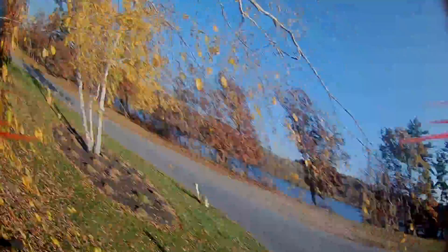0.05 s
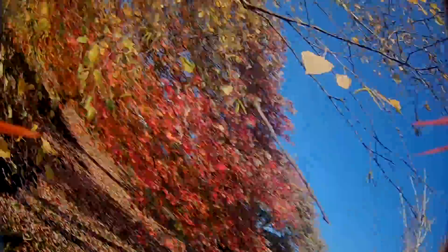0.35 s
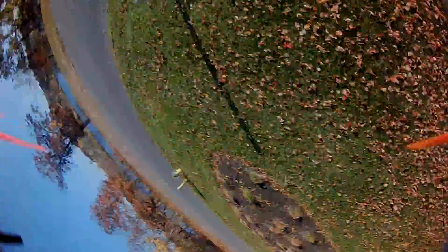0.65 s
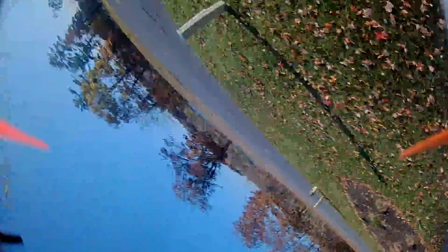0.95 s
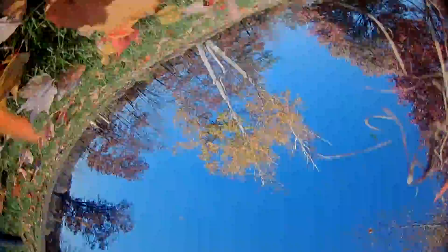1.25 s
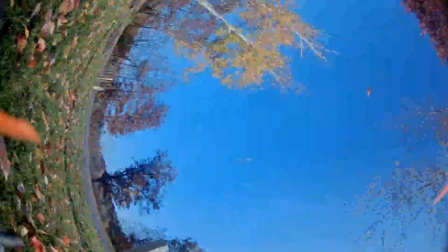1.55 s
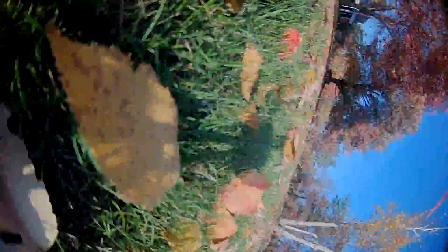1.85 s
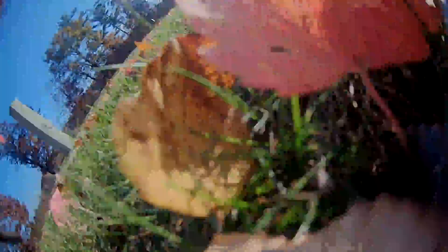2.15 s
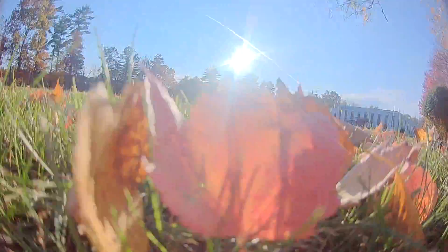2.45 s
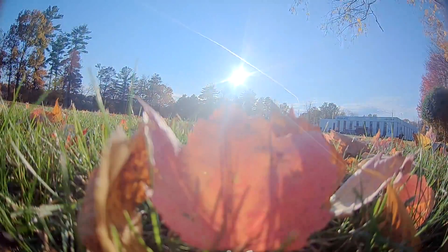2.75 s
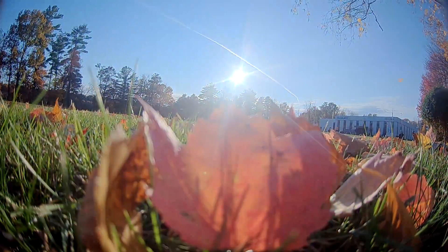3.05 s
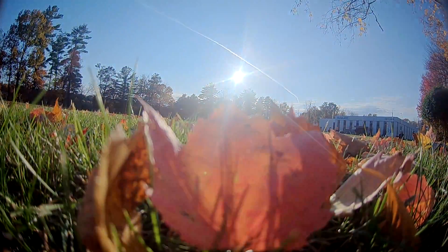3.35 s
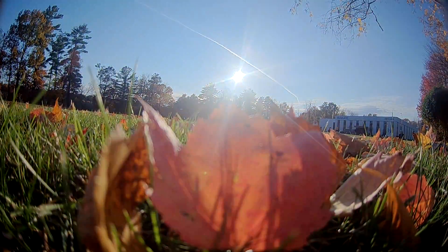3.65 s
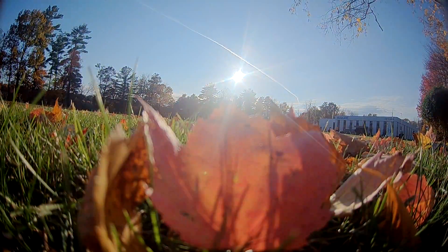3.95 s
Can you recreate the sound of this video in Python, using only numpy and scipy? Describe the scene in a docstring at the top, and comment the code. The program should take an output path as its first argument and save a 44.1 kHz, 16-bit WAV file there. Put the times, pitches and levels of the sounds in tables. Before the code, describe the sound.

A small drone buzzes in loud, distorted surges as its propellers shred leaves. The motors wind down, and it scrapes through branches, then tumbles over dry leaves with crunches and twig snaps. Heard from the drone itself, outdoors.

```python
"""In a birch and on the dry leaves below, heard point-blank from the microphone on a crashing drone.
The motors surge and overload the microphone while the propellers thrash the leaves, then coast down.
The frame brushes the last branches, falls, and tumbles over leaves and grass with crunches, snapping
twigs and dull bumps. It lies still, with a few late ticks in quiet air."""
import sys
import numpy as np
from scipy import signal
from scipy.fft import rfft, irfft, next_fast_len
from scipy.io import wavfile
from scipy.ndimage import uniform_filter1d, map_coordinates

SR = 44100
rng = np.random.default_rng(int(sys.argv[2]) if len(sys.argv) > 2 else 0)


def inscribe(sig):
    """Save sig as 16-bit PCM at rate SR to the path in sys.argv[1].

    A 1-D sig is mono; a 2-D sig holds one channel per row.
    Samples are clipped to [-1, 1] before scaling.
    """
    pcm = np.round(np.clip(np.atleast_2d(sig).T, -1, 1) * 32767)
    wavfile.write(sys.argv[1], SR, pcm.astype(np.int16))


N = 176400

# Tone colour of each source. Each row: frequency in Hz, relative level in dB.
AIR_SPECTRUM = [(25, -21), (120, -11), (350, -15.5), (650, -11.5), (1200, -4.5), (2100, -3.5), (5000, -12),
                (7400, -18), (8300, -34), (11000, -15), (15000, -23.5)]
SIZZLE_SPECTRUM = [(5800, -29), (7100, -4), (9000, -32), (11200, -7.5), (12200, -34.5), (15500, -33.5)]
BUMP_SPECTRUM = [(30, 0), (100, 8), (300, -27), (1500, -60)]
RUSTLE_SPECTRUM = [(30, -30), (350, -39), (700, -14), (1200, -5.5), (2200, 1.5), (3600, 1.5), (5000, -3),
                   (6800, -6.5), (8200, -25.5), (11000, -13.5), (16000, -24.5)]
CRISP_SPECTRUM = [(5000, -34), (9000, -18), (11200, 3.5), (14000, -9.5), (15500, -15.5)]
CRUNCH_SPECTRUM = [(30, -28), (350, -28), (700, -10.5), (1200, -3), (2200, 0), (3600, -1.5), (5000, -4),
                   (6800, -8), (8200, -22), (11000, -12), (16000, -23)]
THRASH_SPECTRUM = [(30, -22), (400, -19.5), (750, -12), (1200, -4), (2400, -2), (4000, -5), (6500, -13),
                   (9000, -16.5), (16000, -21)]
BRANCH_SPECTRUM = [(30, -31.5), (300, -25), (550, -7.5), (850, -2.5), (1700, -2), (2600, -7.5),
                   (4000, -20.5), (6500, -39.5), (9000, -38), (16000, -52)]
# Overall tone colour: dulled, rippled treble with dips at 10, 12 and 14 kHz.
# Each row: frequency in Hz, gain in dB.
OVERALL_COLOUR = [(30, -6), (3000, -0.5), (6800, -5), (8200, -9.5), (10000, -16.5), (11200, -12.5),
                  (12000, -19.5), (13000, -13.5), (14000, -18), (15400, -5)]

# How the noises swell and fade at the microphone. Each row: time in seconds, level in dB.
SIZZLE_LEVELS = [(.76, -36.5), (0.852, -32), (.95, -36), (1.07, -41.5)]  # as the motors run out
RUSTLE_LEVELS = [(1.3, -19), (1.35, -37.5), (1.38, -34), (1.4, -45), (1.5, -46.5), (1.53, -43), (1.6, -52),
                 (1.725, -50), (1.745, -29.5), (1.804, -28), (1.824, -21), (1.855, -26.5), (1.884, -35),
                 (1.907, -23.5), (1.946, -31.5), (1.985, -29), (2.03, -32), (2.06, -18.5), (2.15, -24.5),
                 (2.21, -33), (2.25, -26), (2.395, -25), (2.535, -26.5), (2.566, -34.5), (2.582, -48.5),
                 (2.615, -38.5), (2.635, -36.5), (2.675, -43), (2.76, -52.5), (2.82, -72)]  # leaves under the falling, rolling frame
CRISP_LEVELS = [(1.74, -39), (1.88, -52), (1.955, -38.5), (1.99, -33), (2.06, -30), (2.2, -52.5),
                (2.35, -39), (2.41, -57.5)]  # grass and leaves sliding over the frame
THRASH_LEVELS = [(0, -2.5), (.09, -0.5), (.21, -1), (.28, -6.5), (.34, 2), (.47, -5), (.58, -1),
                 (.64, -10.5), (.72, -1.5), (.79, -13), (.835, -18.5), (.895, -27.5), (.95, -36.5)]  # propellers in the leaves
# The frame on soft ground. Each row: start in seconds, level in dB.
GROUND_BUMPS = [(1.821, -54), (2.126, -32.5), (2.314, -38.5), (2.423, -42), (2.545, -52)]
# Twigs and stalks. Each row: start in seconds, level in dB, pitch in Hz, seconds to die by 60 dB.
TWIG_SNAPS = [(1.451, -22, 3130, 0.015), (1.5496, -18.5, 3360, 0.027), (1.649, -25, 3950, 0.012),
              (1.665, -20.5, 4800, 0.0045), (1.712, -26, 2780, 0.0087), (1.719, -34, 890, 0.058),
              (1.796, -20.5, 3500, 0.012), (1.818, -13.5, 2780, 0.018), (1.845, -15.5, 2500, 0.023),
              (2.045, -6.5, 3300, 0.022), (2.42, -15, 3200, 0.0055), (2.4368, -10.5, 2880, 0.0089),
              (2.458, -8, 2620, 0.013), (2.544, -13.5, 2650, 0.011), (2.6253, -21.5, 2950, 0.013),
              (2.693, -30, 4170, 0.017), (2.808, -38, 2160, 0.013), (2.9733, -19, 4450, 0.0043),
              (2.9749, -27.5, 2310, .008), (3.4323, -31, 4020, 0.0062), (3.433, -30.5, 2400, 0.0065)]
# The frame crushing leaves and hitting branches. Each row: start and length in seconds, level in dB.
LEAF_CRUNCHES = [(1.235, 0.06, -0.5), (1.31, 0.015, -20), (1.334, 0.012, -16), (1.36, 0.012, -19.5),
                 (1.743, 0.0013, -12.5), (1.752, 0.0071, -10.5), (2.046, 0.028, -24), (2.087, 0.019, -9.5),
                 (2.122, 0.011, -10), (2.163, 0.011, -18.5), (2.175, 0.01, -30), (2.221, 0.0063, -22),
                 (2.264, 0.013, -13.5), (2.287, 0.029, -10), (2.325, 0.035, -23), (2.409, 0.017, -21)]
BRANCH_BLOWS = [(.94, 0.011, -19), (.958, 0.073, 1.5), (1.04, 0.0023, -10), (1.058, 0.026, -21),
                (1.094, 0.021, -11.5), (1.126, 0.012, -15.5), (1.14, 0.018, -14.5), (1.162, 0.037, -21),
                (1.207, 0.049, -6)]
# Propellers squeaking on twigs. Each row: time of the peak in seconds, level in dB.
TWIG_SQUEAKS = [(0.055, -9.5), (.3155, 1), (.421, -12), (.595, -4), (0.67, 0)]
# Motors spinning down. Each row: start and end in seconds, starting pitch in Hz, relative level in dB.
SPIN_DOWNS = [(.688, .945, 7600, -1.5), (.725, .895, 3430, -1), (.703, .74, 3400, -1)]
# A coasting propeller's loudness by pitch. Each row: pitch in Hz, gain in dB.
SPIN_DOWN_GAIN = [(1000, -28), (1900, -9.5), (3000, -2.5), (4000, -8), (7000, -3)]
# The loudest motor and the one opposite, fighting for balance.
# Each row: time in seconds, blade pitch in Hz, relative level in dB.
LEAD_SURGES = [(0, 997, -8), (.022, 956.6, -9.5), (.038, 1329, -5), (.062, 778.5, -13.5), (.085, 1051, -22),
               (.1, 851.5, -12), (.122, 1100, 8.5), (.145, 1092, 2), (.187, 1020, 2.5),
               (.208, 680.5, -12.5), (.23, 722.5, -3.5), (.258, 1124, 9), (.28, 1167, 4.5),
               (.306, 1087, 3.5), (.33, 677, -14), (.348, 719, -4), (.364, 1048, 9), (.39, 1413, -11.5),
               (.411, 1096, 3), (.433, 717.6, -12.5), (.444, 1385, -16.5), (.468, 1631, -2.5),
               (.492, 1681, 8.5), (.51, 1419, -1.5), (.533, 1608, 9.5), (.572, 1193, -3),
               (.598, 999.5, -22), (.609, 1187, -6), (.624, 1459, -1.5), (.637, 1369, -12.5),
               (.652, 1463, -0.5), (.67, 939, -4), (.695, 577, -23)]
OPPOSITE_SURGES = [(.195, 1102, -14.5), (.221, 1520, 4.5), (.245, 1050, -8), (.318, 1000, -12),
                   (.333, 1447, 4), (.347, 1528, 4), (.362, 1000, -8), (.49, 1254, -33), (.515, 1387, -1.5),
                   (.56, 790, -9), (.59, 948.6, -7), (.615, 1316, -9), (.655, 1389, 8.5), (.685, 1077, -19),
                   (.71, 898.5, -7.5), (.75, 601.4, -13)]

RELEASE_S = .0051
CRACKLES_PER_S, CRACKLE_SPREAD_DB = 1500, 3
SNAP_WIDTH_OCT, SNAP_RISE_S = .71, .00021
SNAP_EDGE_DB, SNAP_EDGE_HZ, SNAP_EDGE_WIDTH_HZ = -11.5, 12000, 2000
SQUEAK_HZ, SQUEAK_WIDTH_HZ, SQUEAK_S = 10960, 270, .004
MOTORS_DB, RASP_PER_S = .5, 1600
DRAG_HZ, FRICTION_PER_S = 3362, 5  # air drag outweighs friction above DRAG_HZ
CLIP_LEVEL, CLIP_BIAS, TOP_HZ = .25, .024, 15780  # the bias makes the overload slightly lopsided


def amp(db):
    """Decibels to gain."""
    return 10 ** (np.asarray(db) / 20)


def unit(x):
    """Scale to rms 1."""
    return x / np.sqrt(np.mean(x ** 2) + 1e-20)


def clock():
    """Time of each sample in seconds."""
    return np.arange(N) / SR


def along(points, hz):
    """Read (Hz, value) points at hz, on a log frequency axis."""
    knots_hz, values = np.transpose(points)
    return np.interp(np.log(hz + 1), np.log(knots_hz + 1), values)


def envelope(points):
    """Gain along (seconds, dB) points, fading quickly outside them."""
    times, db = np.transpose(points)
    t = clock()
    outside = np.maximum(times[0] - t, 0) + np.maximum(t - times[-1], 0)
    return amp(np.interp(t, times, db)) * np.exp(-outside / RELEASE_S)


def wobble(rate):
    """A smooth random curve, rate knots a second."""
    return map_coordinates(rng.standard_normal(int(N * rate / SR) + 4), [np.arange(N) * rate / SR])


def filtered(x, response):
    """Filter x by a gain given as a function of Hz."""
    size = next_fast_len(N + 8192)
    return irfft(rfft(x, size) * response(np.fft.rfftfreq(size, 1 / SR)), size)[..., :N]


def coloured(x, spectrum):
    """Filter x by (Hz, dB) points."""
    return filtered(x, lambda hz: amp(along(spectrum, hz)))


def noise(spectrum):
    """Coloured noise, rms 1."""
    return unit(coloured(rng.standard_normal(N), spectrum))


def crackle(spectrum, share=.47):
    """Tiny leaf fractures carry a share of the power, rubbing hiss the rest; rms 1."""
    sizes = amp(CRACKLE_SPREAD_DB * np.minimum(rng.exponential(size=N), 5))
    fractures = (rng.random(N) < CRACKLES_PER_S / SR) * sizes * rng.choice([-1, 1], N)
    rubbing = rng.standard_normal(N)
    return unit(coloured(np.sqrt(share) * unit(fractures) + np.sqrt(1 - share) * rubbing, spectrum))


def contacts(rows, attack_s):
    """Gain of a run of contacts: each rises, holds for its length and dies away."""
    t, gain = clock(), np.zeros(N)
    for start, length, db in rows:
        attack = np.clip((t - start) / attack_s + .5, 0, 1)
        release = np.exp(-np.maximum(t - start - length, 0) / RELEASE_S)
        gain += amp(db) * attack * release
    return gain


def air():
    """Quiet air and hiss around the tree, wavering slightly."""
    return amp(-56 + .4 * wobble(12)) * noise(AIR_SPECTRUM)


def whine(hz, db):
    """A faint, steady tone of the electronics."""
    return amp(db) * np.sqrt(2) * np.sin(2 * np.pi * hz * clock())


def sizzle():
    """A thin, high hiss that lingers after the power is cut."""
    return envelope(SIZZLE_LEVELS) * noise(SIZZLE_SPECTRUM)


def bumps(t60_s=.1):
    """The frame meets soft ground with short, dull thuds."""
    t = clock()
    gain = sum((t > start) * amp(db - 60 * np.maximum(t - start, 0) / t60_s)
               for start, db in GROUND_BUMPS)
    return gain * noise(BUMP_SPECTRUM)


def snaps():
    """Each twig breaks in a broad, bright-edged burst around its own pitch, gone in milliseconds."""
    out, t = np.zeros(N + SR), np.arange(SR // 20) / SR
    hz = np.fft.rfftfreq(len(t), 1 / SR) + 1
    edge = amp(SNAP_EDGE_DB) * np.exp(-((hz - SNAP_EDGE_HZ) / SNAP_EDGE_WIDTH_HZ) ** 2)
    for start, db, pitch, t60 in TWIG_SNAPS:
        body = 1 / (1 + (np.log2(hz / pitch) / SNAP_WIDTH_OCT) ** 4)
        phases = np.exp(2j * np.pi * rng.random(len(hz)))
        burst = unit(irfft((body + edge) * phases, len(t)))
        gain = amp(db - 60 * t / t60) * (1 - np.exp(-t / SNAP_RISE_S))
        out[round(start * SR):][:len(t)] += gain * burst
    return out[:N]


def dry_leaves():
    """Right at the microphone, leaves rustle and hiss as the drone rolls, and crunch at each bounce."""
    rustle = envelope(RUSTLE_LEVELS) * amp(1.8 * wobble(130)) * crackle(RUSTLE_SPECTRUM)
    crisp = envelope(CRISP_LEVELS) * amp(3 * wobble(150)) * crackle(CRISP_SPECTRUM)
    crunch_gain = contacts(LEAF_CRUNCHES, attack_s=.00045) * amp(1.8 * wobble(240))
    return rustle + crisp + crunch_gain * crackle(CRUNCH_SPECTRUM)


def branches():
    """The frame scrapes through branches on its way down."""
    gain = contacts(BRANCH_BLOWS, attack_s=.008) * amp(1.7 * wobble(160))
    return gain * crackle(BRANCH_SPECTRUM, share=.41)


def thrash():
    """The propellers shred leaves in a ragged crackle."""
    gain = envelope(THRASH_LEVELS) * amp(4.56 * wobble(91.64))
    return gain * crackle(THRASH_SPECTRUM, share=.49)


def squeaks():
    """Spinning blades rub twigs: short swells of one high, unsteady tone."""
    t = clock()
    phase = 2 * np.pi * np.cumsum(SQUEAK_HZ + SQUEAK_WIDTH_HZ * wobble(1500)) / SR
    swells = sum(amp(db) * np.exp(-((t - peak) / SQUEAK_S) ** 2) for peak, db in TWIG_SQUEAKS)
    return swells * np.sin(phase)


def propeller(hz, jitter, flutter_db, overtone_db, rasp):
    """The blade tone and its octave, unsteady in pitch and level; leaf strikes chop it into a rasp."""
    def strikes():
        return rasp * wobble(RASP_PER_S)

    phase = 2 * np.pi * np.cumsum(hz * (1 + jitter * wobble(450))) / SR
    blade = np.cos(phase) * (1 + strikes())
    octave = amp(overtone_db) * np.cos(2 * phase + strikes()) * (1 + strikes())
    return unit((blade + octave) * amp(flutter_db * wobble(260)))


def coasting_motors():
    """Power is cut: drag and friction slow the propellers, which fade as their pitch gets low."""
    out = np.zeros(N)
    for start, end, start_hz, db in SPIN_DOWNS:
        age = np.clip(clock() - start, 0, .5)
        hz = 1 / ((1 / start_hz + 1 / DRAG_HZ) * np.exp(FRICTION_PER_S * age) - 1 / DRAG_HZ)
        gain = envelope([(start, db), (end, db)]) * amp(along(SPIN_DOWN_GAIN, hz))
        out += gain * propeller(hz, jitter=.03, flutter_db=4, overtone_db=-12, rasp=.42)
    return out


def driven_motor(surges):
    """A motor surges and brakes beside the microphone, its blade tone gliding up and down."""
    times, pitches, db = np.transpose(surges)
    hz = uniform_filter1d(np.interp(clock(), times, pitches), size=350)
    gain = envelope(np.column_stack([times, db + MOTORS_DB]))
    return gain * propeller(hz, jitter=.016, flutter_db=2.6, overtone_db=-7.5, rasp=.4)


def scene():
    """Everything reaches one microphone on the frame, the same in both channels."""
    motors = driven_motor(LEAD_SURGES) + driven_motor(OPPOSITE_SURGES) + coasting_motors()
    tree = squeaks() + sizzle() + thrash() + branches()
    tumble = dry_leaves() + bumps() + snaps()
    background = air() + whine(hz=5825, db=-70.5) + whine(hz=15680, db=-73)
    mono = background + tumble + tree + motors
    return np.array([mono, mono])


def record(dry):
    """The microphone overloads hard. The treble sounds dulled and rippled, and stops at TOP_HZ."""
    oversampled = signal.resample_poly(dry, 2, 1, axis=1)
    clipped = np.clip(oversampled, CLIP_BIAS - CLIP_LEVEL, CLIP_BIAS + CLIP_LEVEL)
    overloaded = signal.resample_poly(clipped, 1, 2, axis=1)
    return filtered(coloured(overloaded, OVERALL_COLOUR), lambda hz: hz < TOP_HZ)


dry = scene()
out = record(dry)
inscribe(out)
```